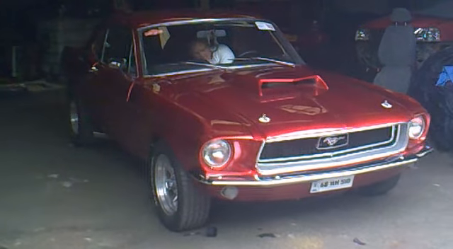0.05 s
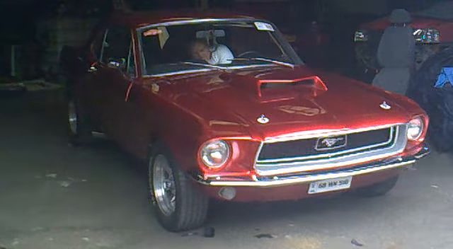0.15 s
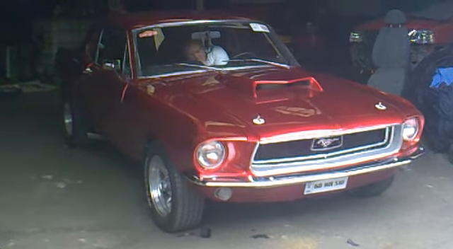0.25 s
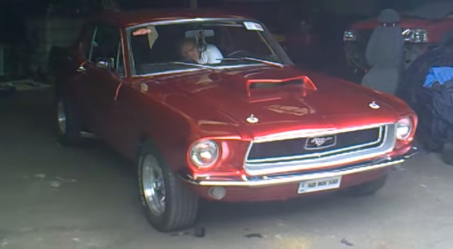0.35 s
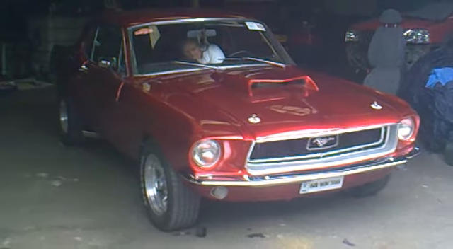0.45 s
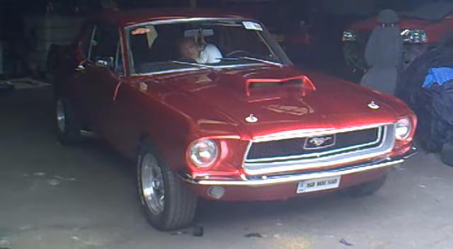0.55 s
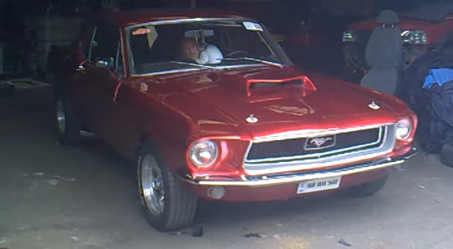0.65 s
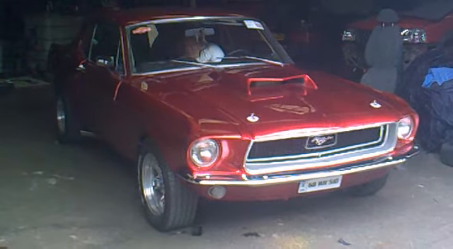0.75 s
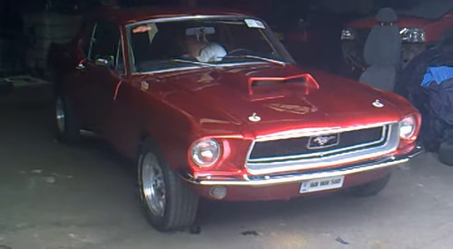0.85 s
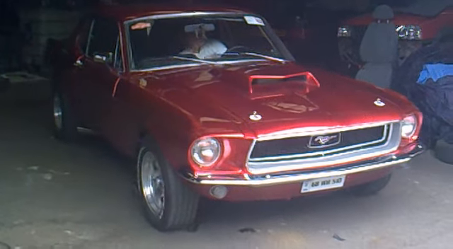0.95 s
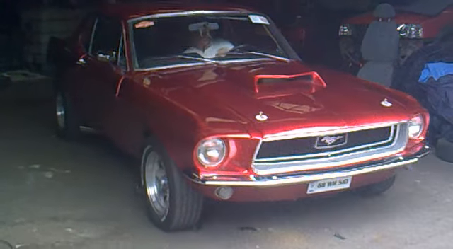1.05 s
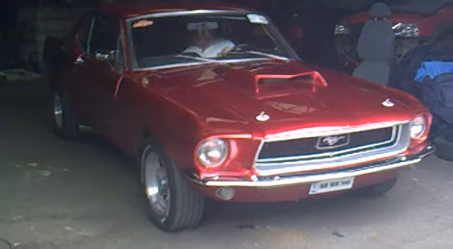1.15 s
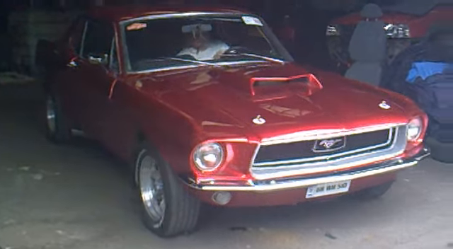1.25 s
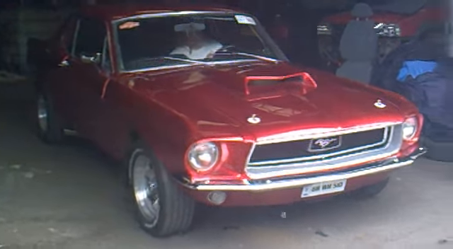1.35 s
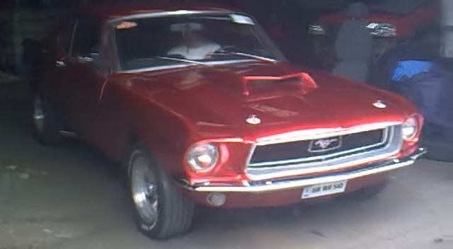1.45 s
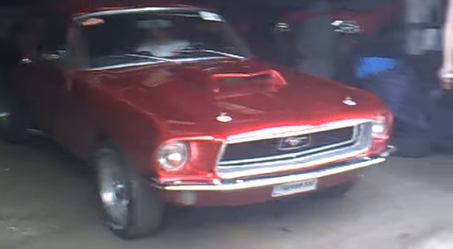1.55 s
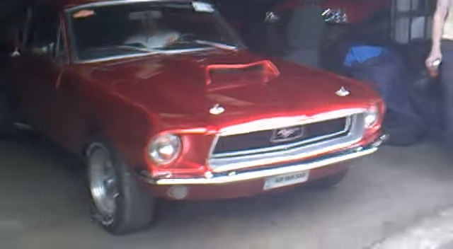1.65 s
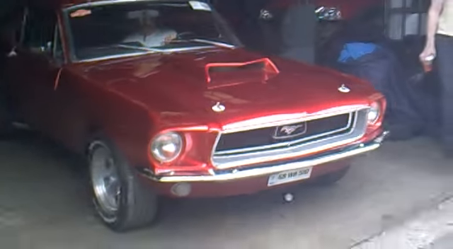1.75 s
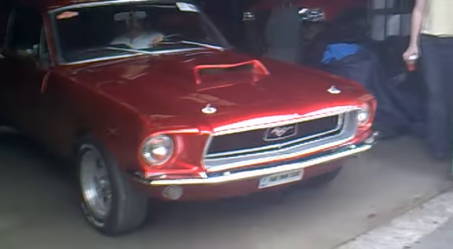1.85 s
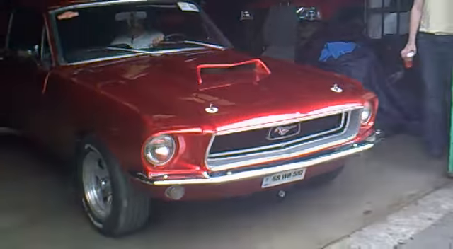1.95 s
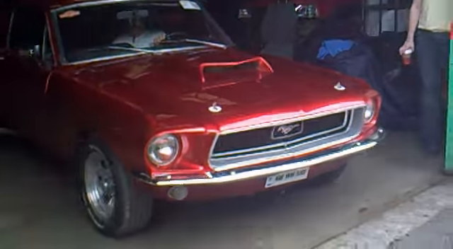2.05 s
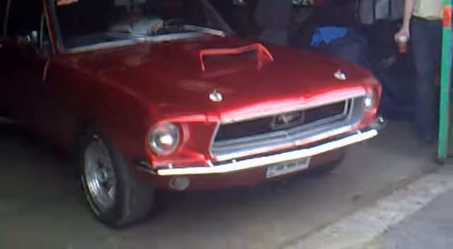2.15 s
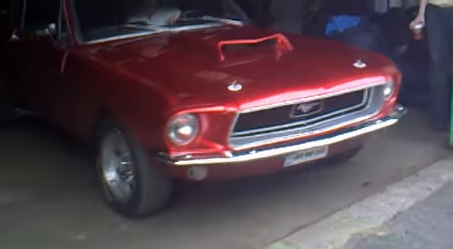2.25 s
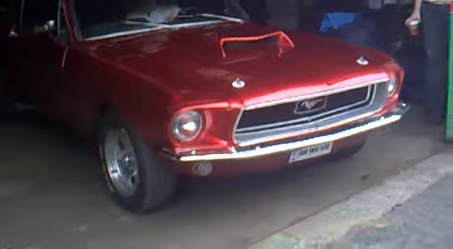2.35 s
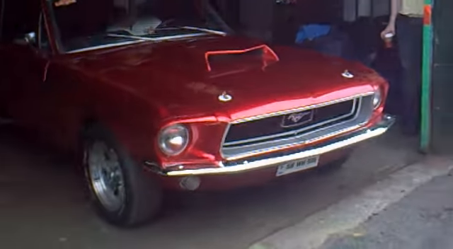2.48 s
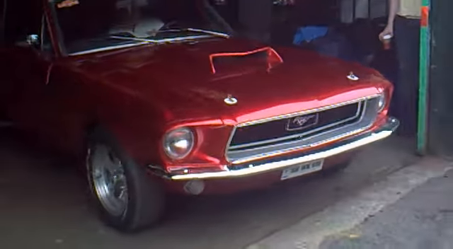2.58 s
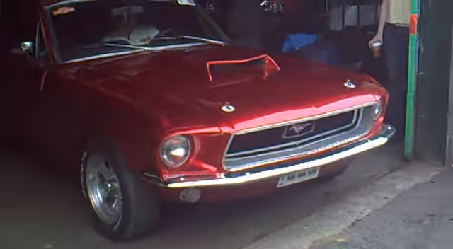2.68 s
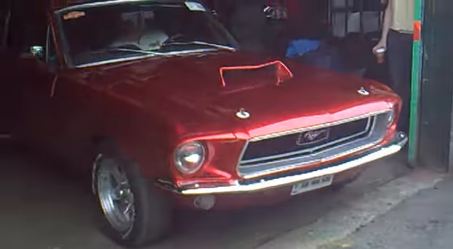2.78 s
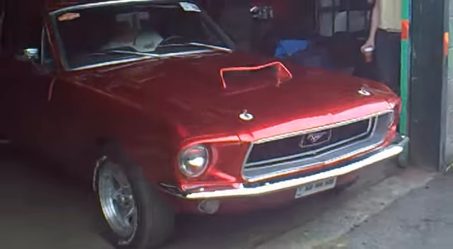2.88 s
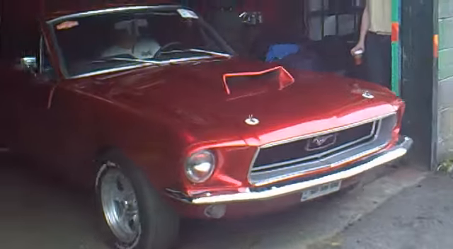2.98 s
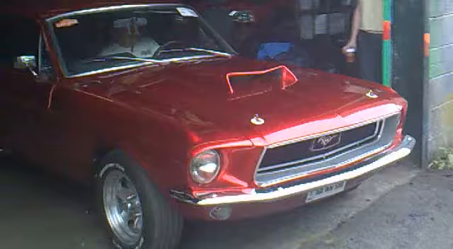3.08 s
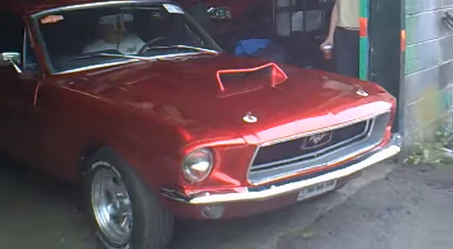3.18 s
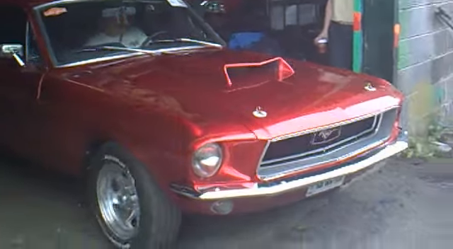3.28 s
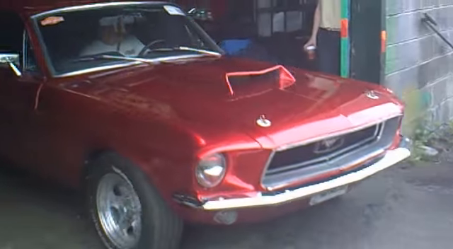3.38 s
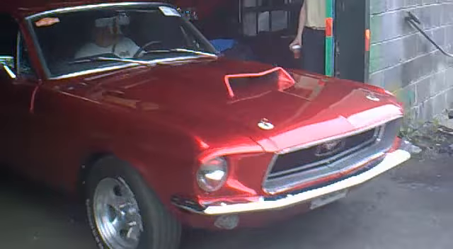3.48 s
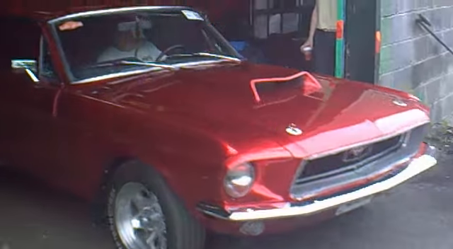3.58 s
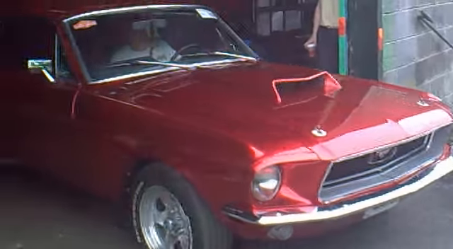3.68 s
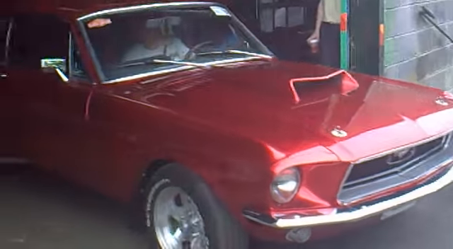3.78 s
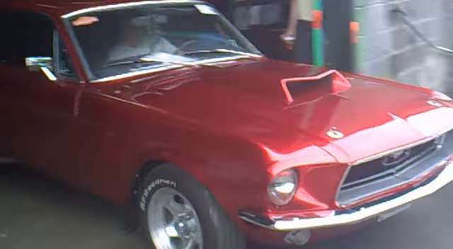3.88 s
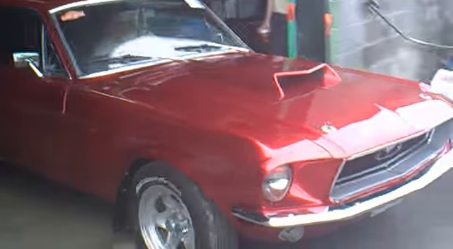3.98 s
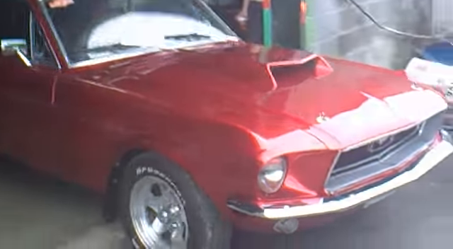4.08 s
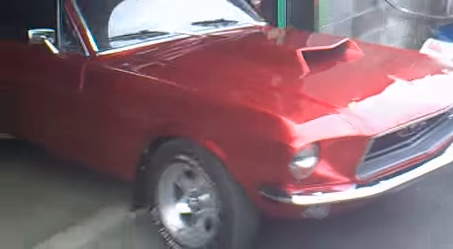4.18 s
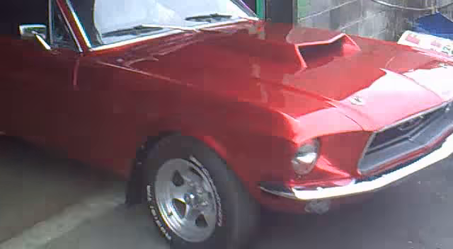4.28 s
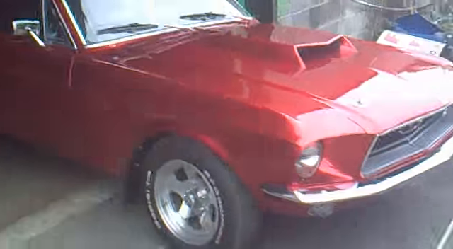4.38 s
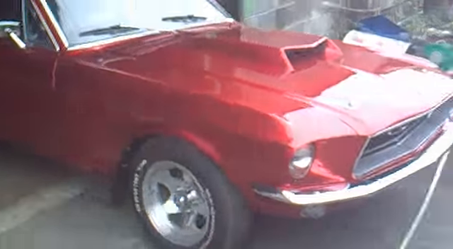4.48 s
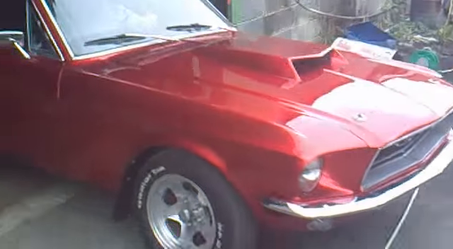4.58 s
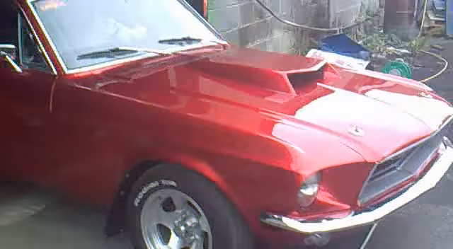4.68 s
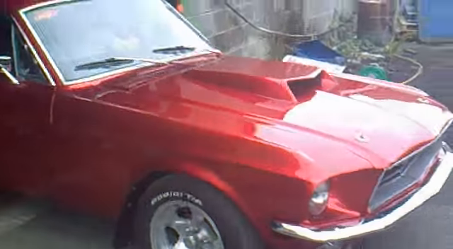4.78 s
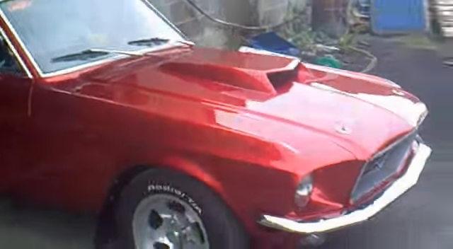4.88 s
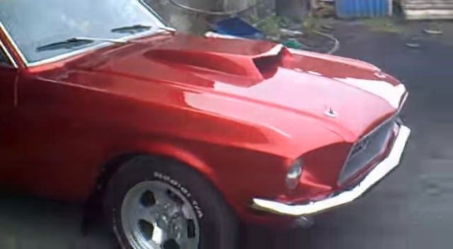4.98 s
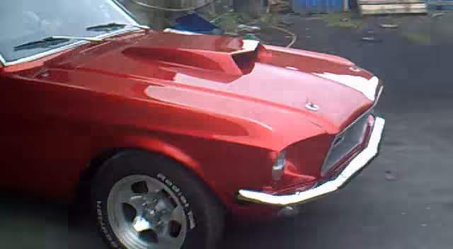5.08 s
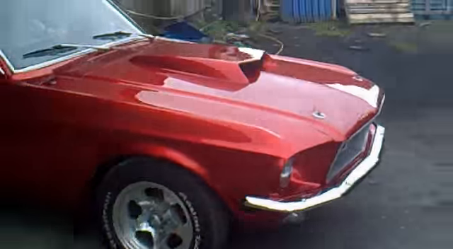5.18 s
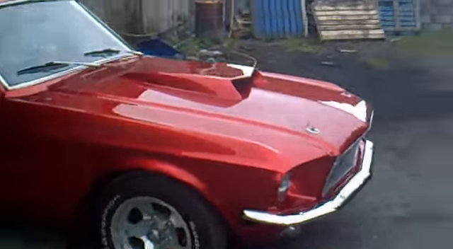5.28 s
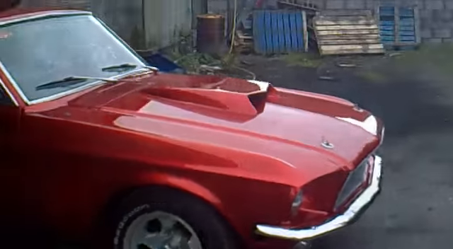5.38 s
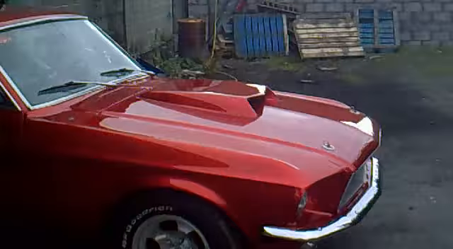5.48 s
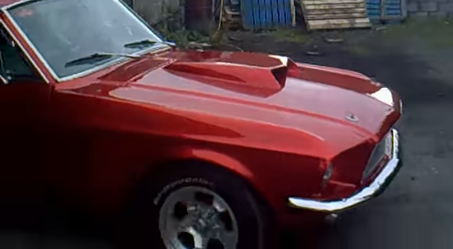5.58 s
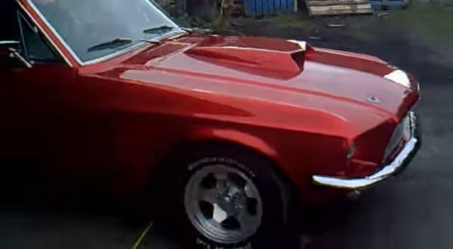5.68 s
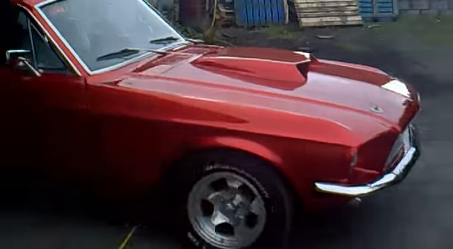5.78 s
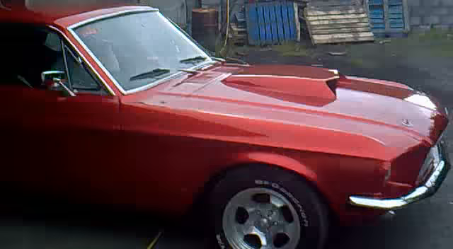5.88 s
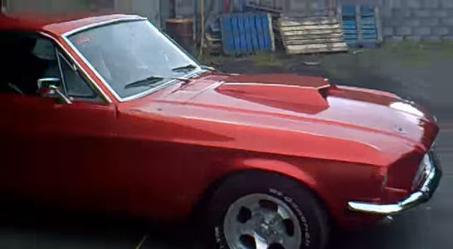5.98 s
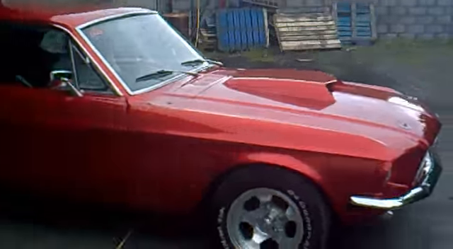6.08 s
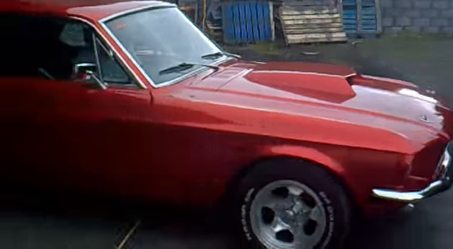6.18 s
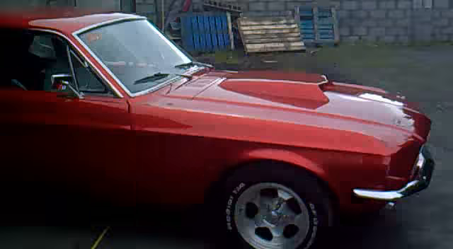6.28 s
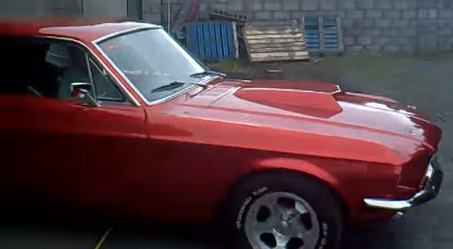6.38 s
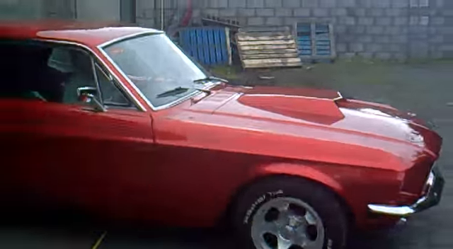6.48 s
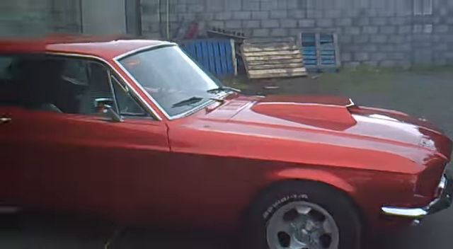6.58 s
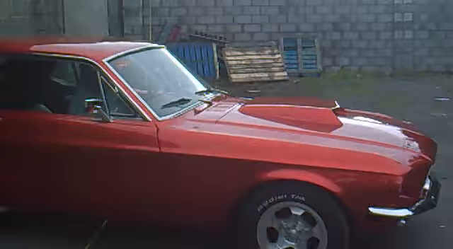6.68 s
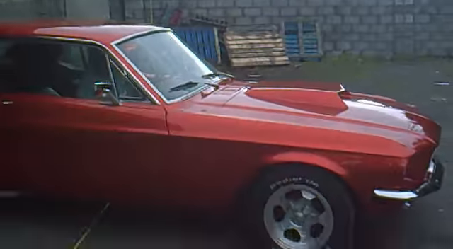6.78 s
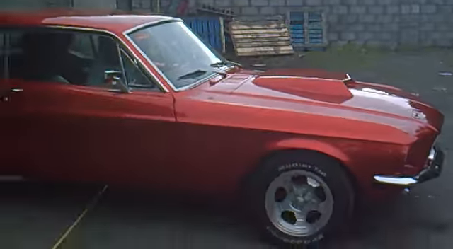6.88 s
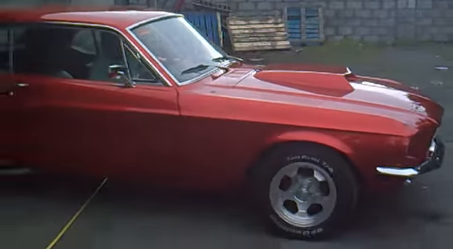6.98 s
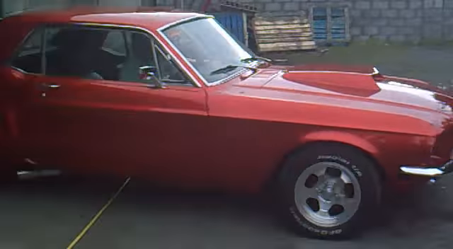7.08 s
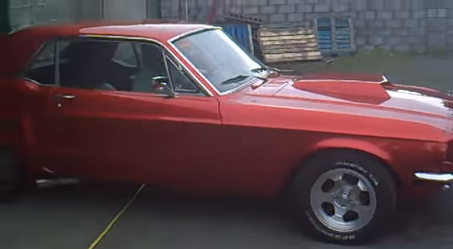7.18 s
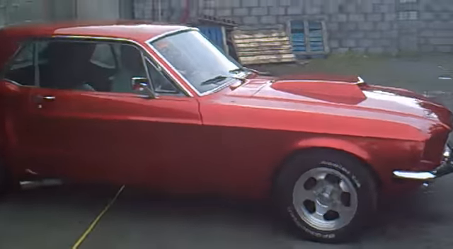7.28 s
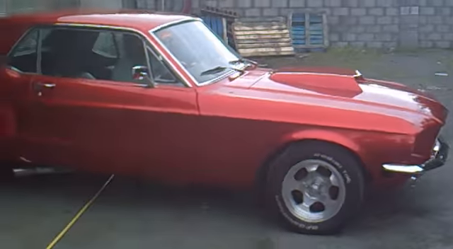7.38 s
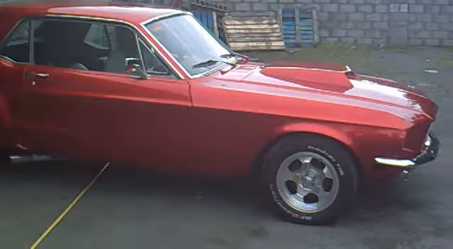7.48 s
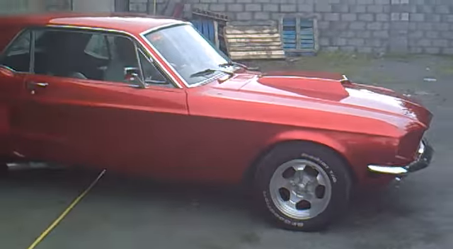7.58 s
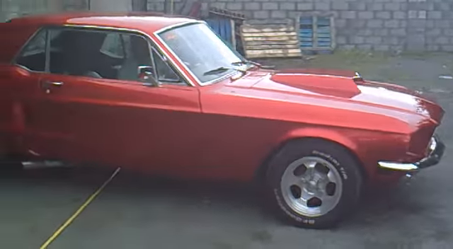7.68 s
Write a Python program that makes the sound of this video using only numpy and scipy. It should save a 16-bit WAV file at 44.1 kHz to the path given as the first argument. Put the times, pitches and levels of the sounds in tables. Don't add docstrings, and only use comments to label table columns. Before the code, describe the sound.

Inside a garage an old eight-cylinder car holds a fast, uneven idle with a faint belt squeak. The revs drop and two sharp steel clacks with loose rattling mark the gear engaging. It then creeps out through the doorway into a yard, the throbbing exhaust growing barkier, raspier and hissier as its side faces a close handheld small-camera microphone; tiny high brake squeaks, then a quick fade.

```python
import sys
import numpy as np
from scipy import signal
from scipy.fft import rfft, irfft, next_fast_len
from scipy.io import wavfile
from scipy.ndimage import uniform_filter1d, map_coordinates

SR = 44100
rng = np.random.default_rng(int(sys.argv[2]) if len(sys.argv) > 2 else 0)


def natural_amplitude(level_db):
    exponent = np.asarray(level_db, float) / 20
    return 10 ** exponent


def master(y):
    cut = np.clip(np.atleast_2d(y).T, -1, 1)
    pcm = np.round(cut * 32767)
    wavfile.write(sys.argv[1], SR, pcm.astype(np.int16))


N = 341334

# (time [s], speed [turns/s])
CAM_SPEED = [(0.0, 12.155), (0.38, 12.685), (0.75, 12.765), (1.05, 8.291), (1.21, 8.032), (1.61, 9.211),
             (1.76, 9.471), (3.08, 9.238), (3.8, 9.36), (4.02, 9.247), (4.28, 8.51), (4.8, 8.689),
             (5.26, 8.589), (5.72, 8.749), (5.96, 8.46), (6.3, 8.51), (7.51, 8.268), (7.74, 6.774)]
# (time [s], stage [0-2], gain [dB], garage boom [dB])
PLACE = [(0, 0.017, 0, -1), (.76, 0, -0.5, 1.5), (.88, 0.69, -1, 6.5), (1.0, 1.4, -2.5, 6.5),
         (1.1, 0.1, -11.5, 7.5), (1.3, 0.091, -1.5, 11), (1.5, 1.35, 1, -4), (4.0, 1.24, 0, 1.5),
         (4.4, 2.26, -0.5, -2), (7.5, 1.77, 0, 2.5), (7.74, 2.6, -3.5, -2)]
# (time [s], firing order 8 [dB], pipe drone, order 11 [dB], side pipe facing [0-2])
DRIVE = [(0, -41, -40, 0), (.6, -34, -46, 0.083), (.75, -40, -42, 0), (.9, -26, -47, 0),
         (1.15, -41, -33, 0.078), (1.3, -36.5, -30.5, 0.59), (1.65, -22.5, -31.5, 1.12),
         (2.0, -28, -40, 0.78), (2.8, -26, -34, 1.02), (3.25, -24.5, -34.5, 1.0), (3.7, -33, -31, 1.3),
         (4.1, -34.5, -30, 1.03), (4.2, -27, -32.5, 0.8), (4.45, -29.5, -33.5, 1.05),
         (4.75, -29, -24.5, 1.44), (5.45, -34.5, -23, 2.0), (7.1, -28, -23, 2.0),
         (7.74, -37.5, -29.5, 1.77)]
# (slot [1/8 camshaft turn], bass push [dB])
BANK = [(2.25, -1.3), (4.25, -.6), (5.3, -11), (7.3, -.8)]
KICK_DB = [-7, -8, 0, -6]
# (order, fast idle [dB], doorway [dB], yard [dB])
ORDER_DB = [(3, -63, -56, -52), (4, -64, -64, -62), (6, -46, -53, -57), (7, -41, -47, -50),
            (9, -47, -39, -38), (10, -58, -40, -40), (12, -54, -51, -54), (13, -49, -46, -40),
            (14, -52, -50, -45), (15, -46, -47, -50), (16, -38, -47, -47), (17, -46, -48, -52),
            (18, -47, -53, -58), (19, -57, -43, -44), (20, -59, -48, -48), (21, -44, -50, -45),
            (22, -54, -55, -57), (23, -56, -49, -48), (24, -50, -52, -52), (25, -58, -63, -54),
            (26, -59, -53, -46), (27, -43, -52, -54), (28, -57, -59, -55), (29, -61, -69, -52),
            (30, -58, -51, -46)]
BEAT_DB = (-52, -50.5, -40)
TOP_DB = (-74, -55.5, -55.5)
# (order, fast idle [dB], doorway [dB], yard [dB])
WHINE = (42.5, -53, -69, -62)
# (frequency [Hz], width [Hz])
BOOM = [(205, 40), (310, 74)]
# (pipe hidden [dB], doorway [dB], facing us [dB])
SPIT_DB = [(-49.5, -42, -45.5), (-52, -44.5, -40), (-67.5, -57, -51.5)]
# (frequency [Hz], width [Hz], level [dB])
BARK_MODES = [(642, 122, -1.5), (848, 164, -1), (1258, 103, -1.5), (1494, 96, -2)]
# (frequency [Hz], width [Hz], level [dB])
RASP_MODES = [(1225, 72, -5.5), (1805, 330, -2), (2137, 380, 2.5), (2448, 210, 1), (2680, 340, -3.5)]
# (frequency [Hz], width [Hz], level [dB])
HISS_MODES = [(3620, 400, 3.5), (4700, 1050, 2.5), (5760, 1030, 5.5), (6530, 1300, 1.5), (8300, 2400, -4),
              (10200, 2300, -8.5), (11300, 1700, -12), (15100, 1400, -16)]
# (slot [1/8 turn], peak [dB])
POPS = [(2.24, -26), (4.3, -20), (5.278, -18.5), (7.321, -29)]
# (slot [1/8 turn], peak [dB])
BARKS = [(2.2, -36), (5.05, -26), (7.4, -33)]
LEAN_S = [2.07, 2.39, 4.11, 4.23, 4.35, 4.46, 3.14, 3.46, 3.68, 3.89, 5.62, 5.85, 6.43, 6.9, 7.03, 7.5]
# (time [s], peak [dB], pitch [Hz])
STRAY = [(5.7164, -16, 2390), (5.801, -17, 2380), (5.687, -16.5, 2480), (7.4185, -19.5, 2200),
         (6.6699, -14.5, 2170), (8, -24, 2700), (7.4624, -22, 2600), (5.9489, -32, 1900),
         (6.5365, -29, 1700), (7.6226, -19.5, 2640), (3.561, -27, 590), (2, -31, 520), (3.786, -25.5, 646)]
# (from [s], to [s])
DOORWAY_S = (2.6, 3.9)
# (time [s], level [dB])
AIR = [(0, 0), (.54, 1), (.95, 0), (1.19, -6), (1.25, 6.5), (1.4, 6.5), (1.87, 1), (2.85, 1), (3.32, 1.5),
       (3.66, 0), (3.88, 1.5), (4.29, -5), (4.74, 1), (5.6, 1.5), (6.88, 1), (7.3, -0.5), (7.6, -3.5),
       (7.74, -3.5)]
# (pipe hidden [dB], doorway [dB], facing us [dB], growth with the air [dB/dB])
RUSH_DB = [(-46, -46.5, -45, 0.53), (-45.5, -43, -46.5, 0.96), (-55, -52.5, -55, 0.67)]
# (frequency [Hz], density [dB per Hz])
LOW_RUSH = [(15, -46), (25, -28), (56, -14.5), (86, -5), (106, -10.5), (146, -17.5), (272, -19.5),
            (340, -15.5), (433, -28.5), (484, -26.5), (626, -16), (835, -21), (1150, -71), (1500, -69),
            (2530, -120)]
MID_RUSH = [(590, -51), (1000, -0.5), (1140, -3.5), (1250, -3.5), (1380, -4), (2170, -1), (2730, -4),
            (3390, -10.5), (3680, -10.5), (4400, -17), (5720, -70), (9680, -120)]
HIGH_RUSH = [(2350, -24), (4000, -2), (4540, -1), (5130, -4.5), (6000, 1.5), (7700, -6.5), (8400, -10.5),
             (9660, -9.5), (10500, -10), (13400, -15.5), (15100, -18), (16000, -15)]
# (time [s], peak [dB], thud re peak [dB])
CLACK = [(1.196, -8, -12.5), (1.211, -25, 1.5), (1.257, -27.5, 0), (1.265, -30.5, 7), (1.298, -1, -31),
         (1.319, -28, -6), (1.343, -22, -10), (1.364, -17, -23), (1.389, -20, -18), (1.41, -16, -30),
         (1.459, -30, -12), (1.499, -41, -4), (1.540, -17.5, -12), (1.579, -38, -3)]
# (frequency [Hz], width [Hz], level [dB])
STEEL = [
    [(713, 72, 7), (863, 140, 2.5), (1244, 53, 4)],
    [(1040, 230, -6.5), (1380, 190, -3.5), (1640, 136, -0.5), (2240, 175, -2.5), (2640, 130, -4), (2920, 450, -4.5), (4440, 2900, -15), (9100, 6000, -22)],
]
# (start [s], length [s], pitch [Hz], level [dB])
SQUEAK = [
    (2.36, .07, 10150, -62),
    (4.052, 0.067, 10100, -56),
    (4.14, .06, 10050, -68),
    (4.505, .075, 10220, -57),
    (4.59, .07, 10200, -71),
    (0.255, 0.43, 1470, -50),
]


def unit(x):
    return x / np.sqrt(np.mean(x ** 2) + 1e-20)


def curves(rows):
    s, *cols = np.transpose(rows)
    return [np.interp(np.arange(N) / SR, s, c) for c in cols]


def by_state(state, levels_db):
    return np.interp(state, range(3), levels_db)


def wobble(rate_hz):
    knots = rng.standard_normal(int(N * rate_hz / SR) + 4)
    return map_coordinates(knots, [np.arange(N) * rate_hz / SR], order=1)


def filtered(x, response):
    m = next_fast_len(N + SR // 4)
    return irfft(rfft(x, m) * response(np.fft.rfftfreq(m, 1 / SR)), m)[:N]


def coloured(spectrum):
    f, db = np.transpose(spectrum)
    response = lambda hz: natural_amplitude(np.interp(np.log(hz + 1), np.log(f), db))
    return unit(filtered(rng.standard_normal(N), response))


def resonance(hz, width_hz):
    return lambda f: 1j * f * width_hz / (hz * hz - f * f + 1j * f * width_hz)


def firing_samples(turns, slot):
    cycle = np.arange(int(turns[-1]))[:, None]
    return np.interp((cycle + slot / 8).ravel(), turns, np.arange(N)).astype(int)


def squeaks():
    t = np.arange(N) / SR
    out = np.zeros(N)
    for start_s, length_s, hz, db in SQUEAK:
        gate = np.clip(np.minimum(t - start_s, start_s + length_s - t) / 0.013, 0, 1)
        level = natural_amplitude(db + 2.5 * wobble(41.3))
        out += level * gate * np.sin(2 * np.pi * hz * t + 0.52 * wobble(60))
    return out


def gear_clacks():
    t = np.arange(SR // 5) / SR
    decay = natural_amplitude(-60 * t / 0.059) + 0.37 * natural_amplitude(-60 * t / 0.19)
    thud, crack = np.zeros((2, N))
    for s, db, thud_db in CLACK:
        hard = db > -10
        attack_s = .0003 if hard else .0012
        blow = rng.standard_normal(len(t)) * decay * (1 - np.exp(-t / attack_s))
        if not hard:
            blow = 1.5 * uniform_filter1d(blow, size=4)
        blow[8:12] = 9 if hard else 0
        start = round(s * SR)
        crack[start:][:len(t)] += natural_amplitude(db + 0.5) * blow
        thud[start:][:len(t)] += natural_amplitude(db + thud_db + 16) * blow

    def ring(modes):
        return lambda f: sum((-1) ** k * natural_amplitude(db) * resonance(hz, width)(f)
                             for k, (hz, width, db) in enumerate(modes))

    no_bass = lambda f: (1j * f / (550 + 1j * f)) ** 2
    return filtered(filtered(thud, ring(STEEL[0])) + filtered(crack, ring(STEEL[1])), no_bass)


def engine_bay(turns):
    air_db, facing = curves(AIR)[0], curves(DRIVE)[2]
    low_db, mid_db, high_db = (by_state(facing, db) + grows * air_db for *db, grows in RUSH_DB)
    once_a_turn = np.cos(2 * np.pi * (turns - .68))
    flutter = np.cos(2 * np.pi * (8 * turns - .7))
    low = natural_amplitude(low_db + 4.5 + 0.41 * once_a_turn + 1.1 * wobble(26)) * coloured(LOW_RUSH)
    mid = natural_amplitude(mid_db - 1.0 + 0.63 * flutter + 1.43 * wobble(25)) * coloured(MID_RUSH)
    high = natural_amplitude(high_db - 1.5 + 0.35 * flutter + 0.75 * wobble(30)) * coloured(HIGH_RUSH)
    return low + mid + high


def puffs(turns, modes, sizes_db, t60_s, tail, scatter_db):
    at = firing_samples(turns, np.transpose(BANK)[0])
    base_db = np.resize(sizes_db, len(at)) + scatter_db / 4 * rng.uniform(-1, 1, len(at))
    t = np.arange(SR // 10) / SR
    shape = (1 - np.exp(-t / 0.00093)) * (natural_amplitude(-60 * t / t60_s) + tail * natural_amplitude(-60 * t / 0.16))
    out = np.zeros(N)
    for hz, width_hz, db in modes:
        strength_db = base_db + scatter_db * rng.uniform(-1, 1, len(at))
        train = np.bincount(at, natural_amplitude(strength_db), N)
        gate = signal.fftconvolve(train, shape)[:N]
        response = lambda f: resonance(hz, width_hz)(f) ** 2
        out += natural_amplitude(db) * filtered(gate * rng.standard_normal(N), response)
    return unit(out)


def firing_rows(turns, cylinders, reach_db, hz, scatter_hz):
    slot, db = np.transpose(cylinders)
    at = firing_samples(turns, slot)
    luck = rng.standard_normal((len(at), 2))
    lean = np.abs(at[:, None] / SR - LEAN_S).min(1) < .013
    level_db = np.resize(db, len(at)) + reach_db[at] - 7 * lean + 1.6 * luck[:, 0]
    return np.c_[at / SR, level_db, hz[at] + scatter_hz * luck[:, 1]]


def hard_firings(events, t60_s, spread_hz, gain_db):
    t, out = np.arange(SR // 12) / SR, np.zeros(N + SR)
    shape = (1 - np.exp(-t / 0.0016)) * (natural_amplitude(-60 * t / t60_s) + 0.052 * natural_amplitude(-60 * t / 0.19))
    for s, db, hz in events:
        tone_hz = hz + rng.standard_normal((5, 1)) * spread_hz
        phase = rng.uniform(0, 2 * np.pi, (5, 1))
        rough = np.sin(2 * np.pi * tone_hz * t + phase).sum(0)
        ring = np.sin(2 * np.pi * hz * t) + 0.23 * rough
        out[round(s * SR):][:len(t)] += natural_amplitude(db + gain_db) * shape * ring
    return out[:N]


def side_pipe(turns):
    facing, t = curves(DRIVE)[2], np.arange(N) / SR
    bark_db, rasp_db, hiss_db = (by_state(facing, db) for db in SPIT_DB)
    bark = puffs(turns + .045, BARK_MODES, [-6, -9, 0, -6], t60_s=.06, tail=.4, scatter_db=3)
    rasp = puffs(turns + .012, RASP_MODES, [0, -2, 1, -1], t60_s=.025, tail=.3, scatter_db=4.5)
    hiss = puffs(turns, HISS_MODES, [0, -10, -1, -1], t60_s=.04, tail=.28, scatter_db=8)

    mouth_hz = np.clip(2469 - 154 * (t - 5.5), 2200, 2600)
    pops = firing_rows(turns, POPS, -32 * np.abs(facing - 2), mouth_hz, scatter_hz=109)
    from_doorway_s = np.abs(t - np.clip(t, *DOORWAY_S))
    barks = firing_rows(turns, BARKS, -9 * from_doorway_s, np.full(N, 667.4), scatter_hz=30)
    upper_barks = barks * [1, 1, 1.27] + [.004, -4.5, 0]
    mouth = hard_firings([*pops, *STRAY[:10]], t60_s=0.031, spread_hz=290, gain_db=-5.5)
    silencer = hard_firings([*barks, *upper_barks, *STRAY[10:]], t60_s=0.087, spread_hz=112, gain_db=-5.0)
    return natural_amplitude(bark_db - 5.0) * bark + natural_amplitude(rasp_db - 2) * rasp + natural_amplitude(hiss_db) * hiss + mouth + silencer


def throb(turns, lag_slots, unsteady_db, scramble_rad):
    step = 20
    slot, push_db = np.transpose(BANK)
    rows = np.array(curves(CAM_SPEED) + curves(PLACE) + curves(DRIVE))[:, ::step]
    speed, stage, gain_db, boom_db, load_db, drone_db, facing = rows
    levels_db = {8: load_db, 11: drone_db, 5: by_state(facing, BEAT_DB)}
    top = [(31 + k, *(np.array(TOP_DB) - 1.1 * k + 4 * rng.standard_normal(3))) for k in range(10)]
    for k, *db in ORDER_DB + top + [WHINE]:
        boom = sum(abs(resonance(hz, width)(k * speed)) ** 2 for hz, width in BOOM)
        unsteady = unsteady_db * wobble(5)[::step]
        levels_db[round(k)] = by_state(stage, db) + gain_db + boom_db * boom + unsteady

    def pulse_phase(k, sizes_db, at_slot):
        return np.angle(np.sum(natural_amplitude(sizes_db) * np.exp(-2j * np.pi * k * at_slot / 8)))

    out = 0
    for k, db in levels_db.items():
        if k > 12:
            scatter = scramble_rad * (.6 + .5 * (facing - 1) ** 2 + .4 * facing)
            phase = scatter * rng.standard_normal() + pulse_phase(k, KICK_DB, slot)
        else:
            phase = pulse_phase(k, push_db, slot + lag_slots)
        drift = (.018 if k > 12 else .009) * k * wobble(8)[::step]
        level = np.sqrt(2) * natural_amplitude(db + 0.28 * wobble(17)[::step])
        out += level * np.cos(2 * np.pi * k * turns[::step] + phase + drift)
    return signal.resample_poly(out, step, 1)[:N]


def scene():
    turns = np.cumsum(curves(CAM_SPEED)[0]) / SR
    car = squeaks() + gear_clacks() + engine_bay(turns) + side_pipe(turns)
    car = car + throb(turns, lag_slots=.65, unsteady_db=1.9, scramble_rad=.6)
    fade_db = -140 * np.maximum(np.arange(N) / SR - 7.69, 0)
    return (car * natural_amplitude(fade_db))[None]


def roll_off(x):
    return signal.sosfilt(signal.butter(12, 16690, fs=SR, output="sos"), x)


def record(dry):
    clipped = dry[0] / (1 + np.abs(dry[0] / .75) ** 6) ** (1 / 6)
    mix = filtered(clipped, lambda hz: hz < 15830)[None]
    return roll_off(mix)


dry = scene()
out = record(dry)
master(out)
```